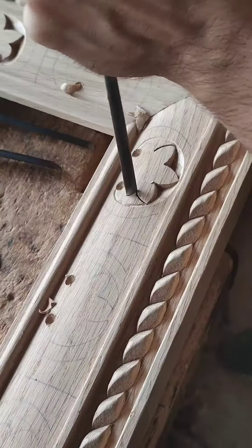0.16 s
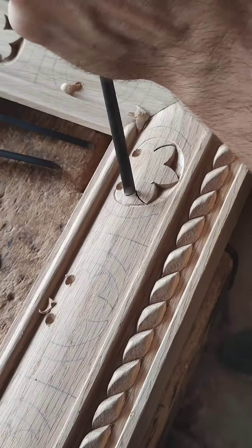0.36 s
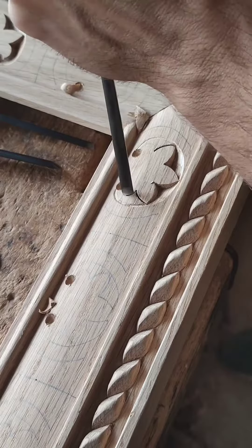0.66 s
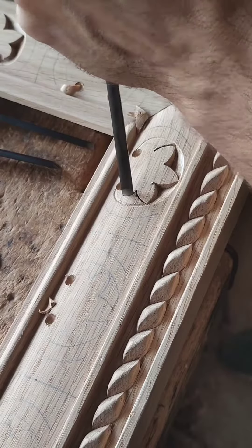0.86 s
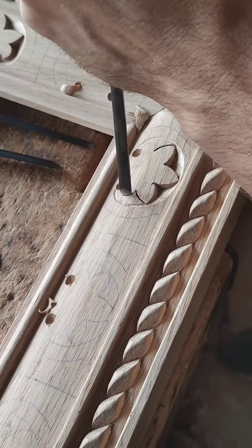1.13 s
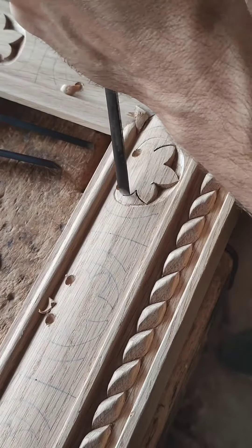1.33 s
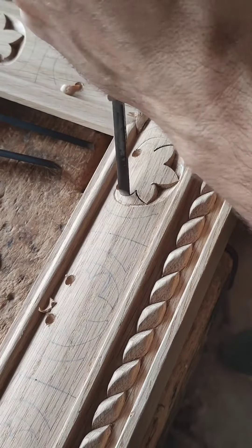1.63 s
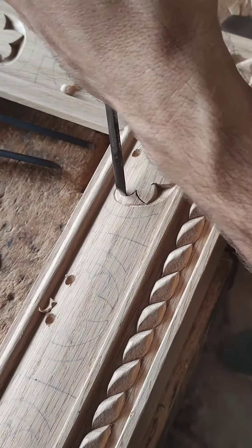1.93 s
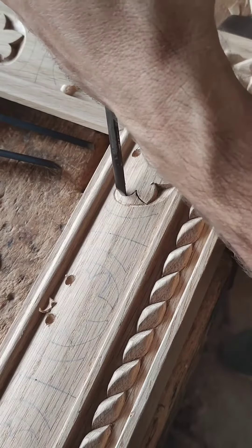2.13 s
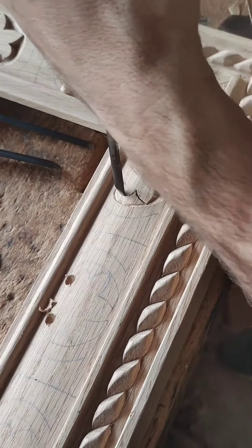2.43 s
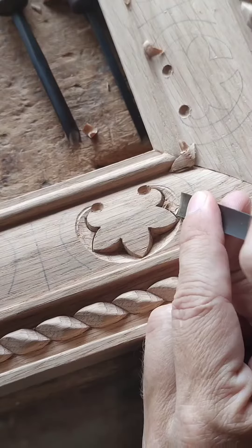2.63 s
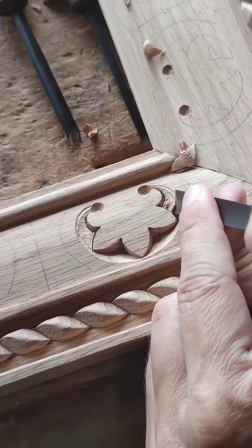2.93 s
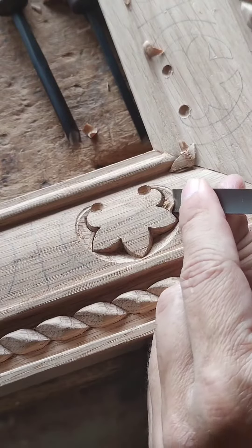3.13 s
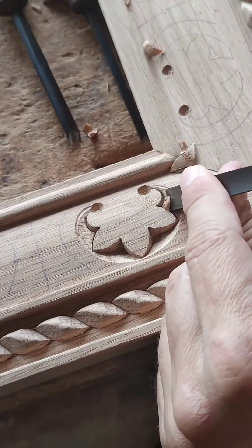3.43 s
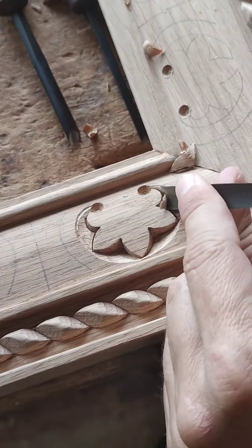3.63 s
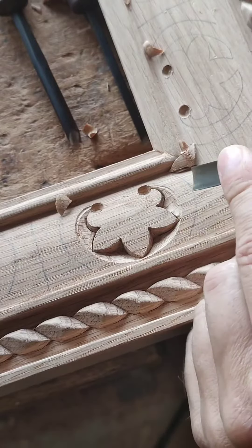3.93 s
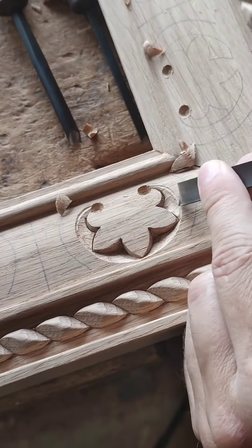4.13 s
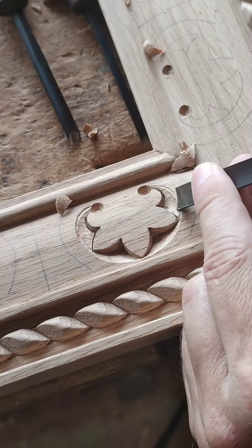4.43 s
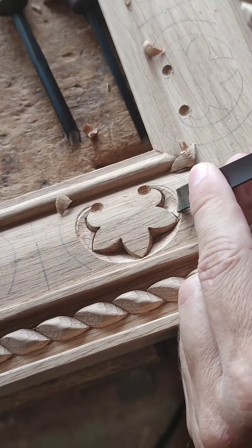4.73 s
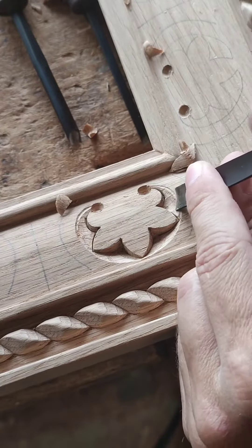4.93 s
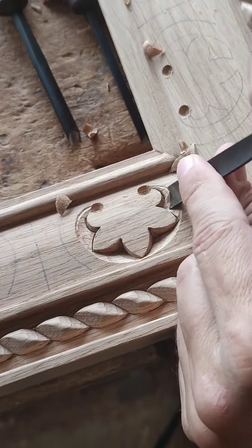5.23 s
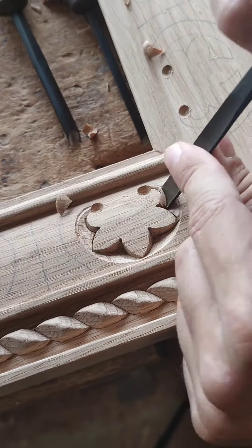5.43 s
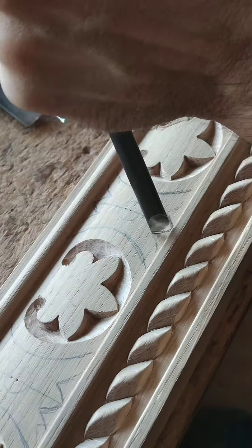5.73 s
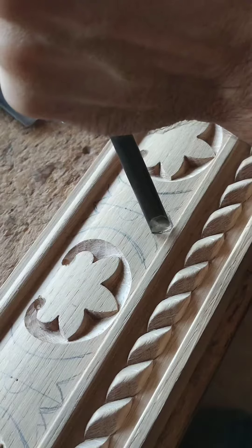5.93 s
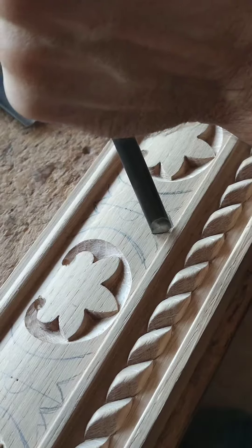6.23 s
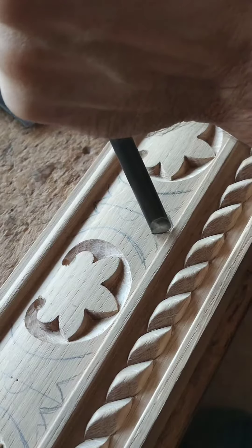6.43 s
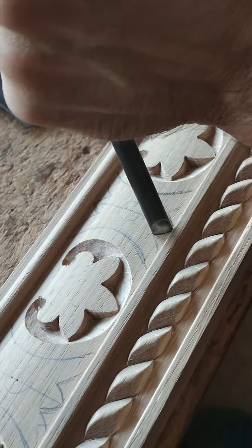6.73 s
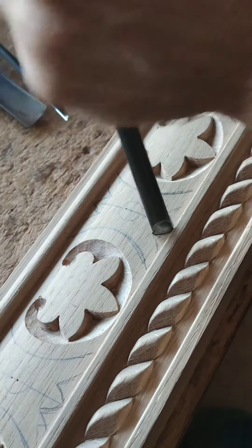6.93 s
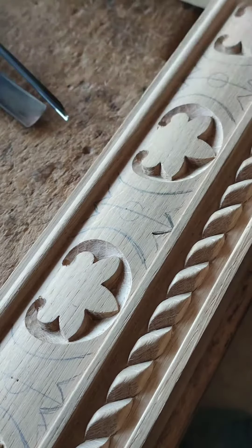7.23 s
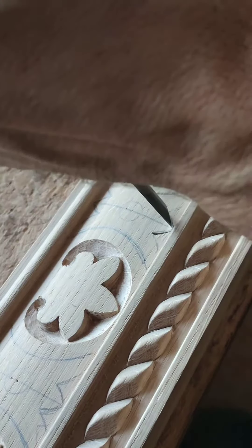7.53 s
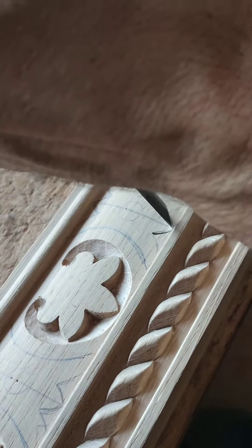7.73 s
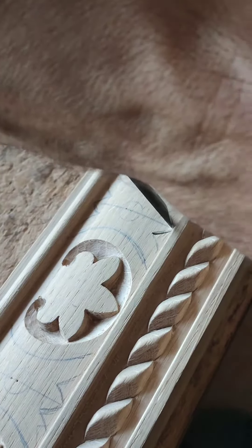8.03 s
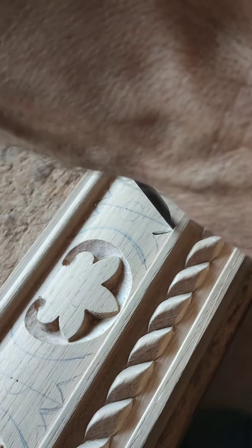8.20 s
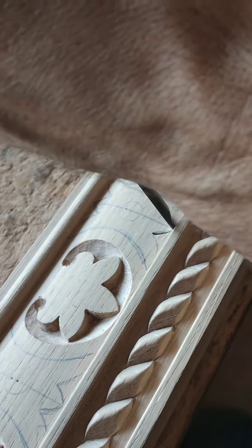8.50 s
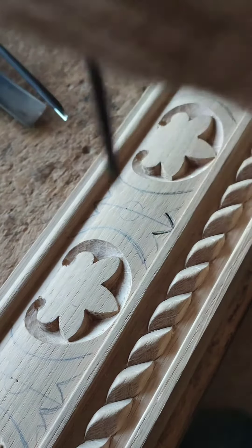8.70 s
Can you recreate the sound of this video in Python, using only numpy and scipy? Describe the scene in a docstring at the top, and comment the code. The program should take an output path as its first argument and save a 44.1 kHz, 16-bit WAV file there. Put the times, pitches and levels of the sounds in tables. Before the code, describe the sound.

A close stereo pickup in a small workshop, with faint wavering rumble and very soft hiss. Mallet blows on a gouge fall at about 0.2, 0.9, 1.6 and 2.2 s: hard, bright wooden cracks with a short body knock, low bench thud and roughly half-second room tail; the fourth is weaker. The tail cuts off near 2.6 s. From 2.7 to 3.5 s there are quiet, dry fibre rubs and tiny ticks, with a soft dull tap at 3.6 and a tick at 3.8. After near-quiet, a longer crackling push with low grumble runs from 5.1 to 5.8 s, with a clearer woody knock at 5.4. Blows resume at 5.9, 6.3, 6.7 and 7.0 s, growing from moderate to very loud, the hardest squashed so their tails swell back. The sound drops at 7.4, a faint dull knock comes at 7.6, then strong blows at 7.9, 8.3 and 8.6 s, rising, the last ringing into the end.

```python
"""A mallet drives a carving gouge into a moulding on a workbench, close to a phone with two microphone ports.
Each blow is a sum of damped modes (handle and blade, moulding, bench, faint steel), noise bursts for the parting
fibres, and a decaying noise tail for the workshop. Between the blows the blade ticks and scrapes: crackling
noise, short or drawn out. Under it lie a wavering rumble and a steady hiss. The phone's limiter ducks the
hardest blows, so their tails swell back."""
import sys
import numpy as np
from scipy import signal
from scipy.fft import rfft, irfft, next_fast_len
from scipy.io import wavfile
from scipy.ndimage import uniform_filter1d, minimum_filter1d, map_coordinates

SR = 44100
rng = np.random.default_rng(int(sys.argv[2]) if len(sys.argv) > 2 else 0)


def wrap_up_sound(samples):
    """Save the sound to the file named by the first command line argument, as 16-bit audio."""
    columns = np.atleast_2d(samples).T
    # keep every value between -1 and 1, then stretch to whole-number steps
    tamed = np.clip(columns, -1, 1)
    steps = np.round(tamed * 32767).astype(np.int16)
    wavfile.write(sys.argv[1], SR, steps)


N = 390726

# low background noise: pitch_hz, relative level_db
RUMBLE_SPECTRUM = [(12, -27), (20, -2.5), (38, -18.5), (65, -21), (82, -25), (300, -37), (390, -63.5),
                   (660, -120)]
# high background noise: pitch_hz, relative level_db
HISS_SPECTRUM = [(120, -40), (200, -2.5), (2460, -14), (2690, -15), (3720, -15.5), (7930, -24.5),
                 (12000, -25), (14900, -42.5)]
RUMBLE_DB, HISS_DB = -59, -72.5

# crackle of wood fibres at the edge: pitch_hz, relative level_db
GRAIN_SPECTRUM = [(240, -34.5), (400, -3.5), (472, -5.5), (3180, -12.5), (4000, -17), (5170, -16.5),
                  (12300, -33), (14900, -71.5)]
# low grumble of the bench under the pushed blade: pitch_hz, relative level_db
GRUMBLE_SPECTRUM = [(41, -30.5), (70, -0.5), (173, -7), (206, -8), (410, -26.5), (500, -17), (650, -47.5),
                    (1100, -120)]
# blade ticks: start_s, level_db, body_db (lift below about 1 kHz)
BLADE_TICKS = [(0.095, -56, 0), (2.9252, -53, -2), (3.0127, -46.5, -4), (3.052, -44.5, -10),
               (3.294, -46.5, -3), (3.81, -45, -4.5), (4.419, -63.5, 11.5), (5.0667, -59.5, -13.5),
               (5.2518, -45, -2.5), (5.381, -34.5, 3), (5.6215, -53, 3.5), (5.755, -63.5, -1)]
TICK_RISE_S, TICK_FALL_S = 0.003, 0.011
# short rubs of the edge in the grain: loudest_s, scrape_db, grumble_db
EDGE_RUBS = [(2.693, -66, -79), (2.789, -60, -67), (2.925, -65.5, -76), (3.03, -63, -56), (3.061, -60, -62),
             (3.306, -58, -67.5), (3.49, -59, -75.5)]
RUB_RISE_DB_PER_S, SCRAPE_FADE_DB_PER_S, GRUMBLE_FADE_DB_PER_S = 354, 282.5, 87
# one long push levers a chip out: time_s, scrape_db, grumble_db
LONG_PUSH = [(5.0, -79.5, -82), (5.15, -66.5, -67.5), (5.24, -67.5, -67), (5.272, -57.5, -47.5),
             (5.4, -56.5, -50), (5.56, -76, -48), (5.634, -71.5, -48.5), (5.78, -72, -56), (5.8, -85, -72)]

# the workshop's answer to a blow: pitch_hz, t60_s, level_db
SHOP_DECAY = [(60, .6, -7.5), (120, 0.89, 4.5), (300, 0.37, 2), (601, 0.46, 1.5), (1000, 0.44, -3),
              (1450, 0.45, -3.5), (2000, 0.47, -4), (3360, 0.45, -9), (4560, 0.45, -10.5),
              (6300, 0.45, -10), (7340, 0.43, -6), (9600, 0.35, -13.5), (13000, 0.38, -14.5),
              (15000, .2, -42.5)]
# correlation of the two ports in that tail: pitch_hz, likeness (-1 to 1)
SHOP_LIKENESS = [(60, 0.87), (300, 1), (630, -0.4), (1400, 0.34), (3000, 0)]
# reflections from near surfaces: delay_s, level_db
NEAR_WALLS = [(.0045, -19), (.008, -17.5), (0.0127, -17), (.018, -19.5), (.021, -17), (.029, -21.5)]

# modes of handle and blade: pitch_hz, level_db, t60_s
TOOL_MODES = [(1203, 2.5, 0.017), (1721, 2.5, 0.017), (2012, -4, 0.03), (2447, -4, .025),
              (2929, -1.5, 0.02), (3480, -3.5, 0.018), (3973, -3.5, 0.018), (5200, -12.5, 0.034),
              (7050, -7.5, .02), (8340, -25, 0.014), (9400, -31, .015), (11200, -33, .015)]
# modes of the moulding: pitch_hz, level_db, t60_s
MOULDING_MODES = [(314, -12.5, 0.032), (367, -14, 0.076), (435.5, -12.5, 0.047), (579.5, -10, 0.053),
                  (742, -15.5, .05), (910, -6.5, 0.031), (1052, -14, 0.032)]
# modes of the bench: pitch_hz, level_db, t60_s
BENCH_MODES = [(51.6, -36, 1.2), (62.2, -33.5, 1.2), (113.8, -20, 0.61), (128.9, -20, 0.51),
               (147, -16, 0.25), (204.8, -19.5, 0.23), (212, -18.5, 0.4)]
# modes of the free steel shank: pitch_hz, level_db, t60_s
STEEL_MODES = [(10200, -61.5, .35), (10900, -64.5, 0.55), (11400, -66.5, 0.69)]
SNAP_DB, SNAP_T60_S = -11.5, 0.012  # first snap of wood on wood
JOLT_DB, JOLT_T60_S = -39.5, 0.7  # the floor shakes under the bench

# moments where the tails of blows and ticks stop short: time_s
TAIL_ENDS = [2.56, 5.79, 7.42]
# softness of the contact, one value from tail end to tail end: corner_hz
CONTACT_CORNERS = [4800, 8500, 5700, 6500]
FIBRE_CORNER_HZ = 11020  # the fibres carry little above this
# blows and knocks: start_s, strength_db, thud_db (bench), body_db (moulding), steel_db, room_db,
# pan_db (left minus right), favoured_hz
MALLET_BLOWS = [(-.2, -23, 8, 2, -10, -5, 0, 2400), (0.1662, -5, 3.5, -1.5, 7, -5, -0.5, 2870),
                (0.893, -2, -0.5, -2.5, -3.5, -7.5, 0.5, 2710),
                (1.5841, 0.5, -2.5, -4.5, -1.5, -9.5, 1, 2790), (2.1918, -8.5, 1.5, 0, 10, -5.5, 1.5, 2100),
                (3.637, -29.5, 10.5, 9.5, 4, -8.5, 0.5, 520), (5.427, -18.5, -3, 9.5, 3, -13.5, 1.5, 956),
                (5.948, -14, 2, 1.5, -2, -11, 0.5, 2820), (6.3413, -6.5, 0.5, 2.5, -5.5, -6, -1, 3370),
                (6.709, 6, -5, 0.5, 4, -6.5, 1.5, 890), (6.988, 10, -6.5, 0.5, -14, -7.5, 1, 605),
                (7.582, -22.5, 8, 5, 4, -10, 1.5, 497), (7.8874, -4.5, 0, 2.5, -7, -6, 0.5, 2060),
                (8.3208, 2, -2, 2.5, -8, -6, 1, 1670), (8.621, 6.5, -6.5, 1, 7, -6, 0, 1900)]
TOP_HZ = 14900  # upper band limit of the phone


def amp(db):
    """Definition of the decibel: amplitude gain of a level in dB."""
    return 10 ** (np.asarray(db) / 20)


def unit(x):
    """Normalisation of power: x at rms 1."""
    return x / np.sqrt(np.mean(x ** 2) + 1e-20)


def along(points, hz, axis=1):
    """Spectral interpolation: one column of a (pitch_hz, value, ...) table on a log frequency axis."""
    table = np.transpose(points)
    return np.interp(np.log(hz + 1), np.log(table[0] + 1), table[axis])


def filtered(x, response):
    """Linear filtering: the spectrum of x times a (complex) response of frequency."""
    size = next_fast_len(x.shape[-1] + 8192)
    spectrum = rfft(x, size) * response(np.fft.rfftfreq(size, 1 / SR))
    return irfft(spectrum, size)[..., :x.shape[-1]]


def paired(x, alike):
    """Inter-channel coherence: two unrelated noises mix into a left and right as alike as the table says."""
    def mid_and_side(hz):
        angle = np.arccos(np.clip(along(alike, hz), -1, 1)) / 2
        return np.array([np.cos(angle), np.sin(angle)])

    mid, side = filtered(x, mid_and_side)
    return np.array([mid + side, mid - side])


def add(out, x, start_s):
    """Superposition: x joins the mix at start_s, fading out within milliseconds at the next tail end."""
    end_s = min([end for end in TAIL_ENDS if end > start_s] + [N / SR + 1])
    at = round(start_s * SR) + np.arange(x.shape[1])
    keep = (at >= 0) & (at < N)
    fade = np.clip((end_s - at / SR) / 0.0037, 0, 1)
    out[:, at[keep]] += (x * fade)[:, keep]


def rumble(size):
    """Partly coherent noise: low stereo rumble, loosely alike at the two ports."""
    low = paired(rng.standard_normal((2, size)), [(60, 0.46)])
    return unit(filtered(low, lambda hz: amp(along(RUMBLE_SPECTRUM, hz))))


def background():
    """Stationary noise: a slowly wavering rumble plus a steady hiss that is unrelated at the two ports."""
    waver_hz = 9  # random levels per second
    levels = rng.standard_normal(int(N * waver_hz / SR) + 4)
    waver = map_coordinates(levels, [np.arange(N) * waver_hz / SR])
    hiss = unit(filtered(rng.standard_normal((2, N)), lambda hz: amp(along(HISS_SPECTRUM, hz))))
    return amp(RUMBLE_DB + 1.5 * waver) * rumble(N) + amp(HISS_DB) * hiss


def shop(size):
    """Diffuse reverberation: a noise tail in which each frequency dies at its own speed, in uneven patches."""
    hz, t, noise = signal.stft(rng.standard_normal((2, size)), SR, nperseg=256)
    patches = uniform_filter1d(rng.standard_normal(noise.shape[1:]), 3, axis=0)
    patches = uniform_filter1d(patches, 7, axis=1)
    start_db = along(SHOP_DECAY, hz, axis=2)[:, None]
    decay_db = start_db - 60 * t / along(SHOP_DECAY, hz)[:, None]
    tail = signal.istft(noise * amp(decay_db + 2.9 * unit(patches)), SR, nperseg=256)[1][:, :size]
    late = np.clip(np.arange(size) / SR / 0.005, 0, 1)  # the first walls arrive late
    return paired(tail, SHOP_LIKENESS) * late


def humps(modes, hz, rise_db, width):
    """Resonant transmission: gain with a hump of relative width at each mode."""
    total = sum(1 / (1 + ((hz - mode[0]) / (width * mode[0])) ** 2) for mode in modes)
    return 1 + amp(rise_db) * total


def fibres(size, crisp_db):
    """Stick-slip crackle: stereo noise whose size jumps from one tiny fibre to the next."""
    jumps = np.repeat(rng.standard_normal(size // 60 + 1), 60)[:size]
    return paired(rng.standard_normal((2, size)) * amp(crisp_db * jumps), [(300, 0.34), (1500, 0.42)])


def grain(hz):
    """Source and filter: the fibre spectrum, coloured by the resonances of the tool."""
    return amp(along(GRAIN_SPECTRUM, hz)) * humps(TOOL_MODES, hz, rise_db=3, width=0.04)


def curve(rows, axis=1):
    """Amplitude envelope: one gain per sample from a table of levels, near silence outside it."""
    table = np.transpose(rows)
    gain = amp(np.interp(np.arange(N) / SR, table[0], table[axis], left=-120, right=-120))
    return np.abs(uniform_filter1d(gain, size=300))


def swell(top_s, db, fade_db_per_s):
    """Exponential envelope: the level climbs to its top and sinks again, both in straight dB lines."""
    t = np.arange(N) / SR - top_s
    return amp(db + np.minimum(RUB_RISE_DB_PER_S * t, -fade_db_per_s * t))


def ticks():
    """Impulsive friction: each tick is a short burst of fibre crackle, with a faint workshop tail."""
    out, t = np.zeros((2, N)), np.arange(SR // 5) / SR
    envelope = (1 - np.exp(-(t / TICK_RISE_S) ** 2)) * np.exp(-t / TICK_FALL_S)
    for start_s, db, body_db in BLADE_TICKS:
        colour = lambda hz: grain(hz) * amp(along([(900, body_db), (1200, 0)], hz))
        puff = unit(filtered(fibres(len(t), crisp_db=3.5), colour)) * envelope
        walls = signal.fftconvolve(puff[:1], shop(len(t)), axes=1)[:, :len(t)]
        add(out, amp(db) * (puff + amp(-32) * walls), start_s)
    return out


def scrape():
    """Sustained friction: the crackle drawn out under rubs and a push, with a low grumble of the bench."""
    drag = unit(filtered(fibres(N, crisp_db=3.5), grain))
    low = paired(rng.standard_normal((2, N)), [(200, 0.77)])
    grumble = unit(filtered(low, lambda hz: amp(along(GRUMBLE_SPECTRUM, hz))))
    drag_gain, grumble_gain = curve(LONG_PUSH), curve(LONG_PUSH, axis=2)
    for top_s, scrape_db, grumble_db in EDGE_RUBS:
        drag_gain = drag_gain + swell(top_s, scrape_db, SCRAPE_FADE_DB_PER_S)
        grumble_gain = grumble_gain + swell(top_s, grumble_db, GRUMBLE_FADE_DB_PER_S)
    return drag_gain * drag + grumble_gain * grumble


def favour(modes, centre_hz, lift_db):
    """Selective excitation: grip, angle and depth of the gouge strengthen the modes near one pitch."""
    return [(hz, db + lift_db * np.exp(-(np.log(hz / centre_hz) / 0.35) ** 2), t60)
            for hz, db, t60 in modes]


def ring(modes, t, spread_db, apart, attack, detune):
    """Modal synthesis: damped sines with chance level, pitch and phase; apart = radians between the ports."""
    hz, db, t60 = np.transpose(modes)[:, None, :, None]
    shape = (2, len(modes), 1)
    hz = hz * (1 + rng.normal(0, detune, shape[1:]))
    level_db = db + rng.normal(0, spread_db, shape) - 60 * t / t60
    phase = 2 * np.pi * rng.random(shape[1:]) + rng.normal(0, apart, shape)
    modes_sum = (amp(level_db) * np.sin(2 * np.pi * hz * t + phase)).sum(axis=1)
    return modes_sum * (1 - np.exp(-(t / attack) ** 2))


def tool_crack(t, contact, favoured_hz):
    """Impact excitation: tool modes, parting fibres and a snap, softened by the contact and the fibres."""
    modes = favour(TOOL_MODES, favoured_hz, lift_db=5)
    crack = ring(modes, t, spread_db=1.48, apart=1.0, attack=0.0016, detune=0.051)
    burst = amp(-3 - 60 * t / 0.023) * (1 - np.exp(-t / 0.00043))
    crack = filtered(crack + burst * rng.standard_normal(crack.shape), contact)  # fibres part under the edge
    snap = filtered(rng.standard_normal(crack.shape), lambda hz: contact(hz / 1.6) ** 2)
    crack += amp(SNAP_DB - 60 * t / SNAP_T60_S) * (1 - np.exp(-(t / 0.0038) ** 2)) * snap
    crack = filtered(crack, lambda hz: 1 / (1 + 1.4j * hz / FIBRE_CORNER_HZ - (hz / FIBRE_CORNER_HZ) ** 2))
    crack[1] = np.roll(crack[1], shift=14)  # samples: the handle is further from the right port
    return crack


def bench_thud(t):
    """Low-frequency structural response: bench modes ring while a noisy jolt shakes the floor."""
    modes = ring(BENCH_MODES, t, spread_db=0.0, apart=0.15, attack=0.01, detune=0.019)
    jolt = amp(JOLT_DB - 60 * t / JOLT_T60_S) * (1 - np.exp(-t / 0.01)) * rumble(len(t))
    return modes + jolt


def room_answer(size, contact, thud_db, body_db):
    """Reverberant colouring: the walls return the colour of the blow, from thud through body to crack."""
    levels = [(35, -22), (90, thud_db), (200, thud_db), (300, body_db), (1000, body_db), (1500, 1.5)]
    woody = lambda hz: humps(MOULDING_MODES + TOOL_MODES[:7], hz, rise_db=2.5, width=0.014)
    return filtered(shop(size), lambda hz: contact(hz) * amp(along(levels, hz)) * woody(hz))


def mallet():
    """Impact and radiation: every blow cracks the tool, knocks moulding and bench, and sets off the room."""
    out, t = np.zeros((2, N)), np.arange(SR * 5 // 8) / SR
    first = t[:SR // 8]
    for start_s, db, thud_db, body_db, steel_db, room_db, pan_db, favoured_hz in MALLET_BLOWS:
        corner_hz = CONTACT_CORNERS[np.searchsorted(TAIL_ENDS, start_s)]
        contact = lambda hz: 1 / (1 + 1j * hz / corner_hz) ** 2  # a soft contact is dull
        direct = tool_crack(first, contact, favoured_hz)
        body_modes = favour(MOULDING_MODES, favoured_hz, lift_db=7.5)
        body = ring(body_modes, first, spread_db=0, apart=0.36, attack=0.002, detune=0.03)
        direct += amp(body_db + np.array([[1.5], [-1.5]])) * body  # stronger at the left port
        # near surfaces return the sound with left and right exchanged
        direct += sum(amp(wall_db) * np.roll(direct[::-1], round(delay_s * SR), axis=1)
                      for delay_s, wall_db in NEAR_WALLS)
        sound = np.pad(direct, ((0, 0), (0, len(t) - len(first))))
        sound += amp(thud_db) * bench_thud(t)
        sound += amp(steel_db) * ring(STEEL_MODES, t, spread_db=0.5, apart=2.1, attack=0.002, detune=0)
        sound += amp(room_db) * room_answer(len(t), contact, thud_db, body_db)
        add(out, amp(db + np.array([[pan_db], [-pan_db]]) / 2) * sound, start_s)
    return out


def scene():
    """Superposition of all sources at the two ports."""
    return mallet() + ticks() + scrape() + background()


def record(dry):
    """Dynamic compression: a limiter looks ahead, holds, and lets go in two stages; then the band limit."""
    top, ahead_s, hold_s, quick_s, slow_s = 0.86, 0.0084, 0.08, 0.038, 0.33
    need_db = np.minimum(0, 20 * np.log10(top / (np.abs(dry).max(axis=0) + 1e-9)))
    span, lead = round((ahead_s + hold_s) * SR), round(ahead_s * SR)
    # lowest gain needed from hold_s ago to ahead_s from now
    held_db = minimum_filter1d(np.pad(need_db, (span, span)), span)[span - span // 2 + lead:][:N]

    def past_mean(size):
        return uniform_filter1d(np.pad(held_db, (size, 0)), size)[size - size // 2:][:N]

    quick_db = np.minimum(past_mean(lead), past_mean(round(quick_s * SR)))
    slow_db = 0.96 * past_mean(round(slow_s * SR))
    limited = dry * amp(np.minimum(quick_db, slow_db))
    return filtered(limited, lambda hz: 1 / (1 + (hz / TOP_HZ) ** 300))


dry = scene()
out = record(dry)
wrap_up_sound(out)
```